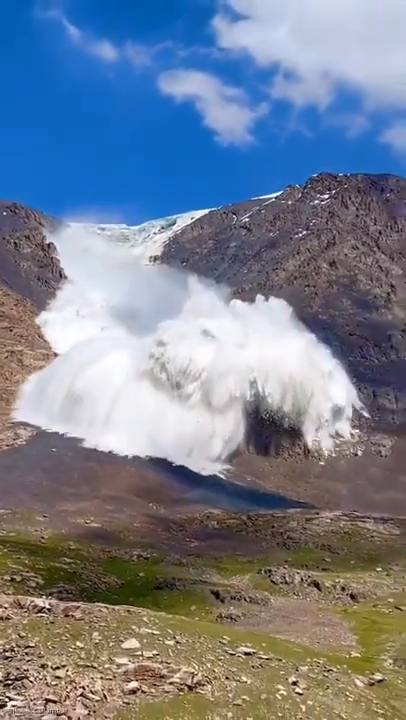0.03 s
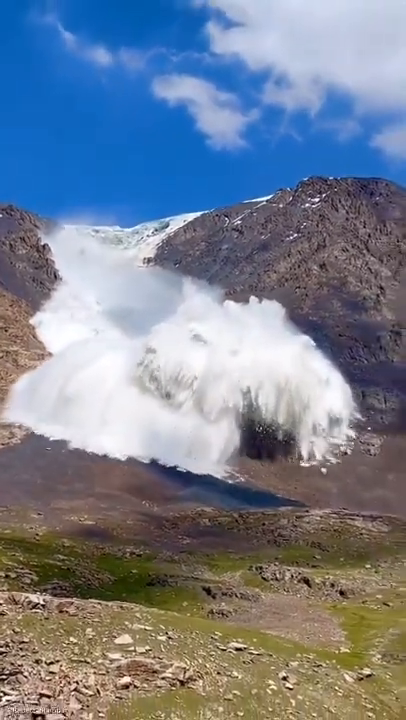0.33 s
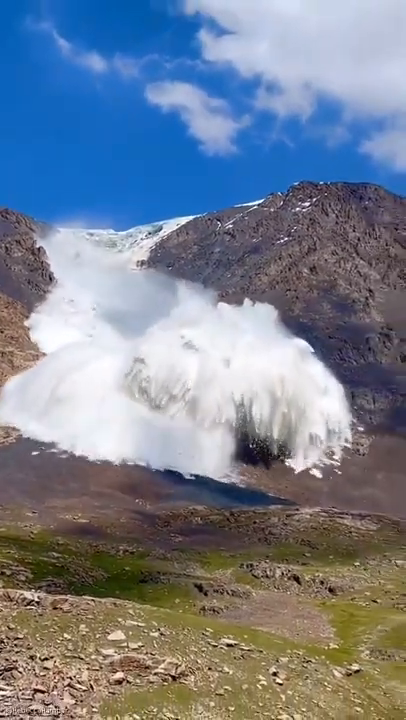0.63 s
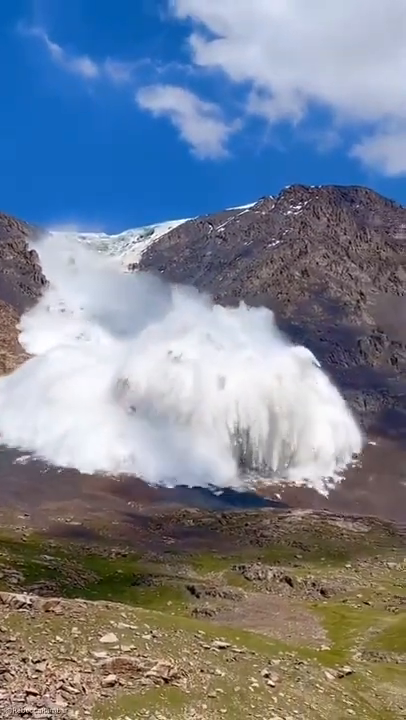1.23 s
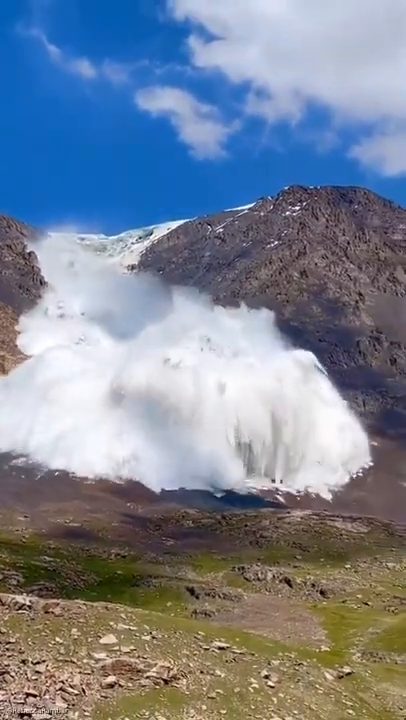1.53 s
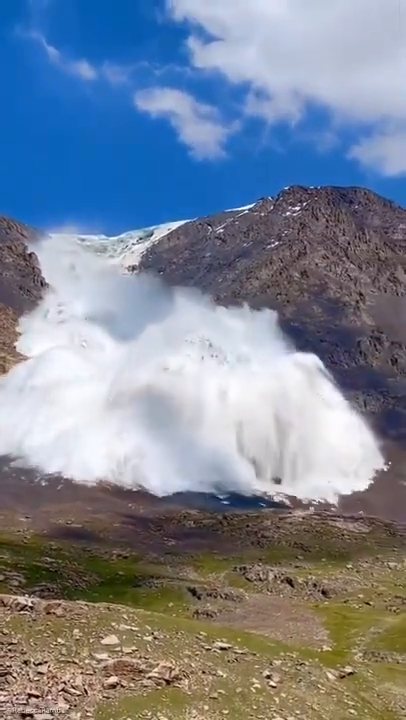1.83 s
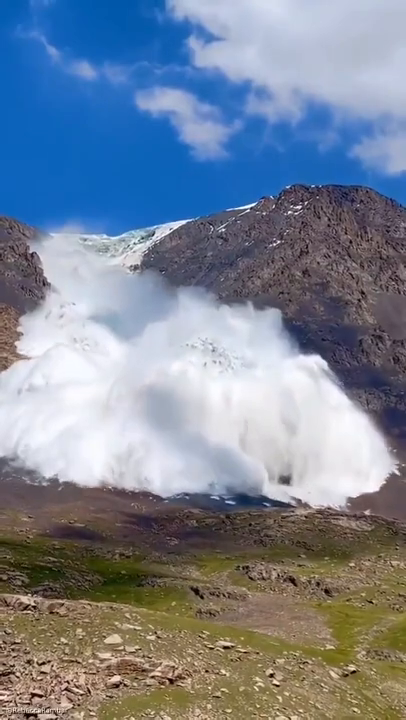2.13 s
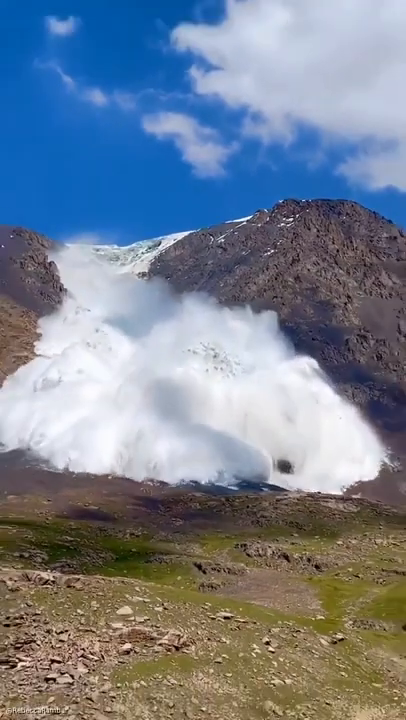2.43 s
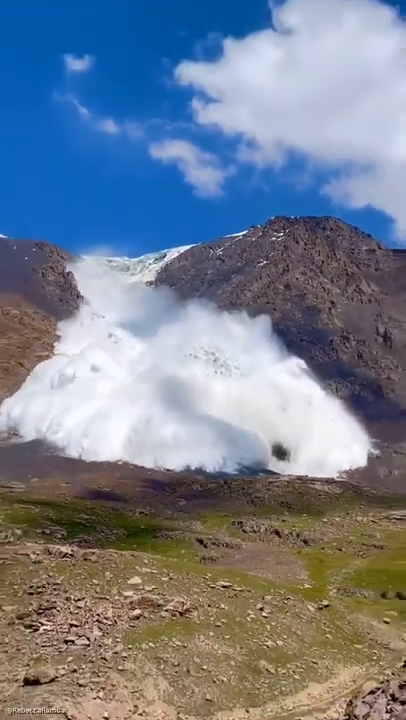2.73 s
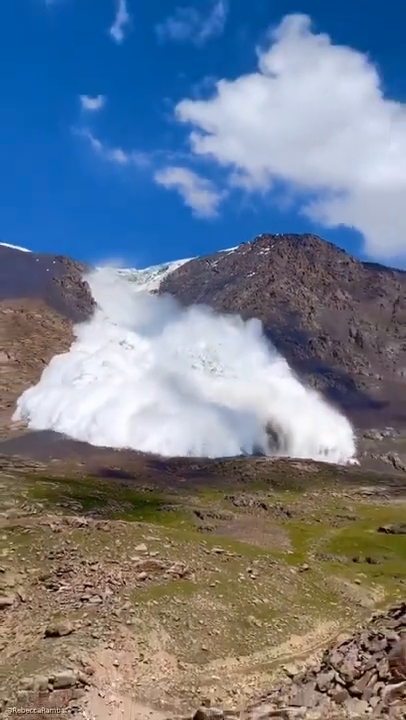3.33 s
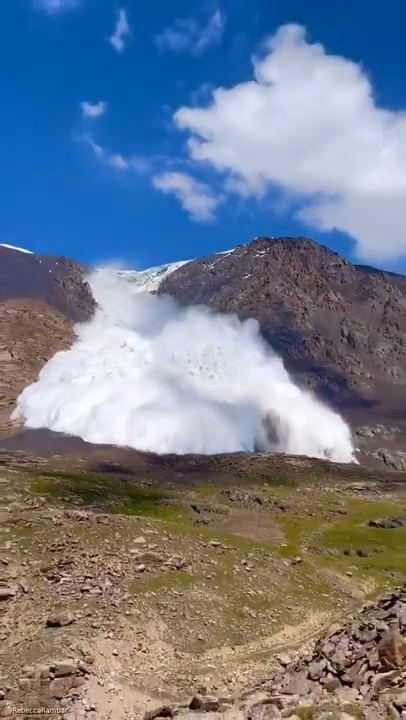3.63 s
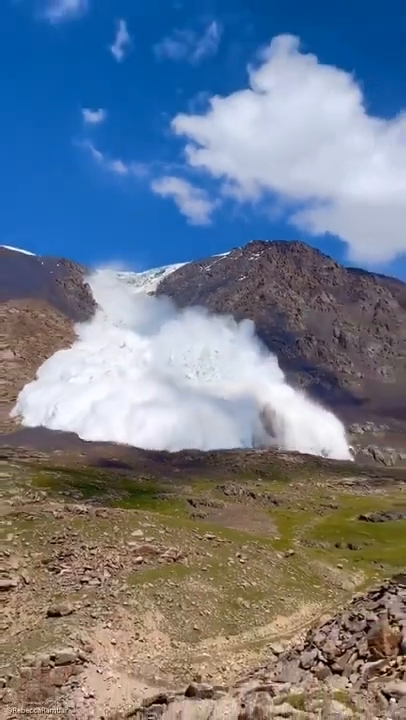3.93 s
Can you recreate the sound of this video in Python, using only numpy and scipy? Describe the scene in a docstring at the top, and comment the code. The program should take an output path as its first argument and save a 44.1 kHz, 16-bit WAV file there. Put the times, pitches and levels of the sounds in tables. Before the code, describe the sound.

A distant avalanche of snow and ice rumbles down a mountainside, swelling into a muffled, crunching roar with dull thuds of landing blocks. Close by, wind buffets the microphone and dies down toward the end.

```python
"""A deep rumble rolls in from a far mountainside: a huge avalanche of snow and ice, swelling as it
reaches the open valley. The moving mass shakes the air, tumbling ice roars and crunches above it,
big blocks land with dull thuds and slabs break up. Distance takes away the treble.
Close by, gusts buffet the microphone and die down toward the end; grit trickles, two stones click."""
import sys
import numpy as np
from scipy import signal
from scipy.fft import rfft, irfft, next_fast_len
from scipy.io import wavfile
from scipy.ndimage import uniform_filter1d, map_coordinates

SR = 44100
rng = np.random.default_rng(int(sys.argv[2]) if len(sys.argv) > 2 else 0)


def master_out(mix):
    """Clip the mix to full scale and print it as 16-bit PCM to the path in sys.argv[1]."""
    frames = np.transpose(np.atleast_2d(mix))
    ceiling = np.clip(frames, -1, 1)
    pcm = np.round(ceiling * 32767).astype(np.int16)
    wavfile.write(sys.argv[1], SR, pcm)


N = 176400

# colour of crushed ice heard from afar (frequency [Hz], relative level [dB])
ICE_SPECTRUM = [(200, -28.5), (500, -6.5), (700, 0), (870, -2.5), (1030, -1), (1300, -10), (1580, -12),
                (1850, -20), (2090, -23), (2520, -36.5), (3050, -48), (3800, -66), (6000, -120)]


def amp(db):
    """Decibels to gain."""
    return 10 ** (np.asarray(db) / 20)


def unit(x):
    """Scale to rms 1."""
    return x / np.sqrt(np.mean(x ** 2) + 1e-20)


def along(points, hz):
    """Read (frequency, value) points on a log axis."""
    frequencies, values = np.transpose(points)
    return np.interp(np.log(hz + 1), np.log(frequencies + 1), values)


def curve(points):
    """Read (time, value) points at every sample."""
    return np.interp(np.arange(N) / SR, *np.transpose(points))


def wobble(per_s):
    """A smooth random curve with per_s knots a second."""
    return map_coordinates(rng.standard_normal(400), [np.arange(N) * per_s / SR + 2], mode="mirror")


def filtered(x, response):
    """Filter x by a gain given as a function of frequency."""
    size = next_fast_len(N + SR // 4)
    return irfft(rfft(x, size) * response(np.fft.rfftfreq(size, 1 / SR)), size)[..., :N]


def band(x, hz, octaves):
    """Keep a bell-shaped band around a pitch."""
    return filtered(x, lambda f: np.exp(-.5 * (np.log2((f + 1) / hz) / octaves) ** 2))


def evened(x):
    """Keep the wandering pitch of a noise but even out its swells."""
    return np.cos(np.angle(signal.hilbert(x)))


def stereo(pair, spectrum, likeness=None):
    """Turn two unrelated signals into one coloured stereo sound of rms 1."""
    # how alike the valley sounds on both channels (frequency [Hz], correlation [-1 to 1])
    valley_likeness = [(30, 0.98), (100, 1), (180, 1), (300, 0.92), (480, 0.84), (700, 0.99), (950, .98),
                       (1600, 0.99), (2100, .7), (2600, -0.41), (3300, 0.12), (5000, -0.076)]

    def mid_side_gains(hz):
        correlation = along(valley_likeness, hz) if likeness is None else np.full_like(hz, likeness)
        angle = np.arccos(correlation) / 2
        return amp(along(spectrum, hz)) * [np.cos(angle), np.sin(angle)]

    mid, side = filtered(pair, mid_side_gains)
    return unit(np.array([mid + side, mid - side]))


def churn(patchy_db):
    """Two noises with shared patches of random gain in time and frequency."""
    spectra = signal.stft(rng.standard_normal((2, N)), nperseg=1024)[2]
    patches = rng.standard_normal(spectra.shape[1:])
    for axis in (0, 1):
        patches = uniform_filter1d(patches, size=6, axis=axis)
    return signal.istft(spectra * amp(patchy_db * unit(patches)), nperseg=1024)[1][:, :N]


def impacts(per_s, spread_db):
    """Two channels of randomly timed pushes, most small and a few large."""
    when, rarity, *pushes = rng.random((int(per_s * N / SR), 4)).T
    size = amp(-spread_db * np.log(np.maximum(rarity, .05)))
    at = (when * N).astype(int)
    return np.array([np.bincount(at, size * np.sign(push - .5), N) for push in pushes])


def struck(x, start, attack_s, length_s):
    """x rises smoothly at start and dies away, with the energy of rms 1 held for length_s."""
    age = np.maximum(np.arange(N) / SR - start, 0)
    envelope = (1 - np.exp(-age / attack_s)) ** 2 * np.exp(-(age / length_s) ** 2)
    return unit(x * envelope) * np.sqrt(length_s * SR / N)


def burst(start, hz, octaves, attack_s, length_s):
    """A short band of noise."""
    return struck(band(rng.standard_normal(N), hz, octaves), start, attack_s, length_s)


def rumble():
    """Far up the slope, the whole mass shakes the air with a deep mono roll."""
    # weight of the moving mass (time [s], level [dB])
    mass = [(0, -31.5), (.4, -37), (.66, -30), (.85, -35), (1.15, -32), (1.7, -31.5), (2.25, -38),
            (2.45, -28.5), (2.62, -30), (2.8, -27), (3.25, -28.5), (3.55, -25.5), (3.7, -28.5), (4, -29.5)]
    # colour of the roll before it is evened (frequency [Hz], relative level [dB])
    spectrum = [(12, -49), (20, -23.5), (32, -15.5), (46, -5), (60, 1), (84, -0.5), (100, -2.5), (125, 1),
                (160, -11.5), (230, -27.5), (500, -60), (1000, -120)]
    roll = evened(filtered(rng.standard_normal(N), lambda hz: amp(along(spectrum, hz))))
    return amp(curve(mass) + .5 + 1.1 * wobble(per_s=15)) * unit(band(roll, hz=74.5, octaves=1))


def roar():
    """Countless distant collisions merge into a roar; larger chunks knock through it."""
    # strength of the flow (time [s], level [dB])
    flow = [(0, -36), (.45, -39), (.7, -36), (1.0, -35.5), (1.14, -33), (1.55, -33), (2.0, -32.5),
            (2.2, -29), (2.4, -30.5), (2.75, -26.5), (3.15, -26), (3.4, -25.5), (3.65, -28), (3.85, -31),
            (4, -30)]
    # colour of tumbling ice across the valley (frequency [Hz], relative level [dB])
    spectrum = [(40, -42.5), (90, -7), (130, 2), (170, 4), (230, 2), (290, -1.5), (360, -1), (415, -3.5),
                (490, -3.5), (660, -6), (880, -16), (1300, -21), (2100, -41.5), (3000, -120)]
    flow_db = curve(flow)
    knocks = amp(-6) * stereo(impacts(per_s=170, spread_db=3), spectrum)
    rush = amp(2.5 + .18 * wobble(per_s=10)) * stereo(churn(patchy_db=1), spectrum)
    tumble = rush + knocks
    body_db = .2 * (flow_db - flow_db.mean())  # the roar gains body as the flow grows
    body = (amp(body_db) - 1) * band(tumble, hz=273, octaves=1)
    return amp(flow_db) * (tumble + body)


def crunch():
    """Crushed ice makes a brighter rush that grows as the front comes into the open."""
    # swell of the crunching ice (time [s], level [dB])
    swell = [(0, -47), (.4, -47), (1.2, -44.5), (1.9, -42), (2.55, -38), (2.85, -35.5), (3.05, -35.5),
             (3.4, -33), (3.65, -34.5), (3.82, -35), (4, -34)]
    return amp(curve(swell) + 1 + .4 * wobble(per_s=18)) * stereo(churn(patchy_db=1.12), ICE_SPECTRUM)


def wind():
    """Gusts buffet the two sides of the microphone unequally, with a few sharp flutters."""
    # gusts on the microphone (time [s], level [dB])
    gusts = [(0, -39), (.2, -30), (.4, -27.5), (.56, -28), (.75, -33), (.98, -38), (1.2, -34.5),
             (1.42, -31), (1.56, -41.5), (1.7, -31.5), (2.05, -40.5), (2.15, -29), (2.27, -44.5),
             (2.39, -28), (2.65, -29), (3.1, -36.5), (3.5, -36.5), (4, -48)]
    # colour of the buffeting (frequency [Hz], relative level [dB])
    spectrum = [(12, -49), (20, -20), (55, -3), (110, -1), (185, -2), (320, -8.5), (560, -13), (750, -27.5),
                (1070, -33.5), (1600, -41.5), (3000, -63.5), (4500, -120)]
    # sharp flutters (time [s], level [dB], pitch [Hz])
    flutters = [(.405, -40, 700), (.472, -39.5, 800), (1.195, -44, 520), (1.215, -31, 150),
                (2.385, -32, 120), (3.42, -28.5, 160)]
    eddies = amp(2 * wobble(per_s=28)) * rng.standard_normal((2, N))
    buffet = amp(curve(gusts) - 2.5) * stereo(eddies, spectrum, likeness=-.47)
    flutter = sum(amp(db) * burst(start, hz, octaves=.46, attack_s=.003, length_s=.021)
                  for start, db, hz in flutters)
    return buffet + flutter * np.array([[1], [-.7]])  # weaker and inverted on the right


def air():
    """A faint hiss that shifts gently in level and colour."""
    # colour of the hiss (frequency [Hz], relative level [dB])
    spectrum = [(100, 11.5), (2400, 17.5), (3100, 13.5), (3900, 0), (6000, -2.5), (9000, -4.5), (12000, -6),
                (15000, -22.5)]
    return amp(-73.5 + .6 * wobble(per_s=8)) * stereo(churn(patchy_db=2.5), spectrum)


def grit():
    """Loose grit trickles with faint, scattered clicks."""
    # colour of the grains (frequency [Hz], relative level [dB])
    spectrum = [(1500, -12), (2900, 1.5), (4000, -13), (6000, -17.5), (9000, -33), (13000, -50)]
    return amp(-87) * stereo(impacts(per_s=160, spread_db=1.5), spectrum)


def block_thuds():
    """Each big block lands far off with one low boom: a few cycles of unsteady pitch."""
    # blocks landing (time [s], level [dB], pitch [Hz], length [s])
    landings = [(0.022, -26, 85.8, 0.028), (0.094, -25.5, 94.4, 0.037), (0.158, -23.5, 84, 0.021),
                (0.239, -27.5, 73.3, 0.033), (0.483, -25, 76.8, 0.048), (0.546, -25.5, 92, 0.026),
                (0.615, -32.5, 113, 0.063), (0.827, -29.5, 187, 0.034), (0.926, -25, 147, 0.026),
                (1.065, -29, 61, 0.099), (1.44, -31.5, 151, .06), (1.593, -27.5, 140, .055),
                (1.692, -34, 68, 0.049), (1.756, -27.5, 158, 0.05), (2.014, -25.5, 69.3, 0.044),
                (2.131, -28.5, 74, 0.071), (2.36, -24.5, 85.5, 0.05), (2.616, -25, 203, 0.07),
                (2.737, -19, 67, 0.031), (2.783, -25.5, 120, 0.05), (2.907, -21.5, 68.5, 0.061),
                (2.971, -26.5, 65.5, 0.052), (3.052, -22, 71.5, 0.066), (3.103, -19, 144.2, 0.034),
                (3.151, -20.5, 205.5, .05), (3.221, -24.5, 80.7, 0.037), (3.385, -21, 88, .07),
                (3.397, -18.5, 170.6, .07), (3.527, -24, 65, 0.031), (3.72, -28.5, 76, 0.036),
                (3.935, -24, 67.7, 0.044)]
    thuds = np.zeros(N)
    for start, db, hz, length_s in landings:
        tone = evened(band(rng.standard_normal(N), hz, octaves=.38))
        boom = band(tone, hz, octaves=.9)
        thuds += amp(db - 1.5) * struck(boom, start, attack_s=.01, length_s=length_s)
    return thuds


def slab_breaks():
    """Distant slabs snap or crumble, with the same dull colour as the crushed ice."""
    # slabs breaking up (time [s], level [dB], length [s])
    slabs = [(0.474, -37, .008), (0.607, -41, 0.0071), (0.798, -39, .006), (1.087, -34.5, .007),
             (1.5, -31.5, 0.0036), (1.552, -34, .006), (2.244, -35.5, .07), (2.667, -29.5, 0.0042),
             (2.892, -32.5, 0.046), (2.906, -27, 0.0089), (3.379, -38.5, 0.067), (3.629, -30, .06)]
    cracks = sum(amp(db) * struck(rng.standard_normal((2, N)), start, .15 * length_s, length_s)
                 for start, db, length_s in slabs)
    return amp(-5) * cracks.std() * stereo(cracks, ICE_SPECTRUM)


def stone_clicks():
    """Small stones click faintly near the microphone."""
    # stones striking (time [s], level [dB], pitch [Hz])
    stones = [(2.4012, -59, 5100), (3.3064, -54, 3000)]
    return sum(amp(db - 19) * burst(start, hz, octaves=.2, attack_s=.0002, length_s=.006)
               for start, db, hz in stones)


def scene():
    """The avalanche lies far off, a little to the right; wind, stones, grit and air are close by."""
    # lean of the avalanche at the microphone (frequency [Hz], left minus right [dB])
    balance = [(60, -0.8), (210, -1.5), (330, -1), (490, -3), (800, -0.5), (1700, 0.5), (2600, 0)]
    avalanche = rumble() + roar() + crunch() + slab_breaks() + block_thuds()
    far = filtered(avalanche, lambda hz: amp(along(balance, hz) * np.array([[.5], [-.5]])))
    return far + wind() + stone_clicks() + grit() + air()


def record(dry):
    """A faint, thin sizzle rides on the loud bass; the recorder keeps nothing above its band limit."""
    sizzle_hz, top_hz = 9600, 15300
    bass = band(dry, hz=170, octaves=.99)
    sizzle = amp(-61) * bass * np.sin(2 * np.pi * sizzle_hz * np.arange(N) / SR)
    return filtered(dry + sizzle, lambda hz: hz < top_hz)


dry = scene()
out = record(dry)
master_out(out)
```